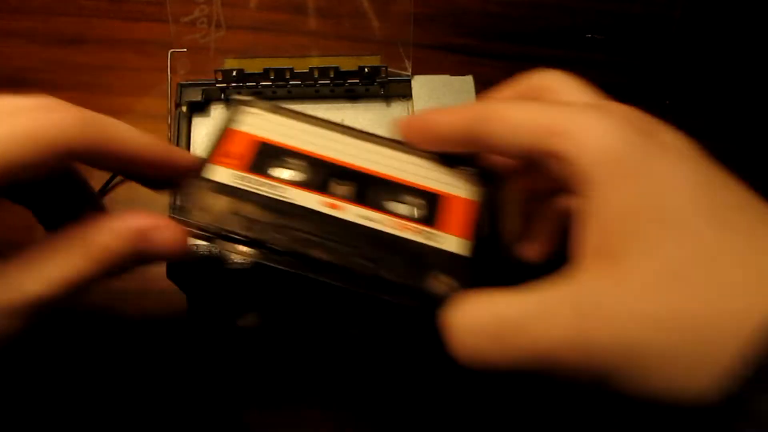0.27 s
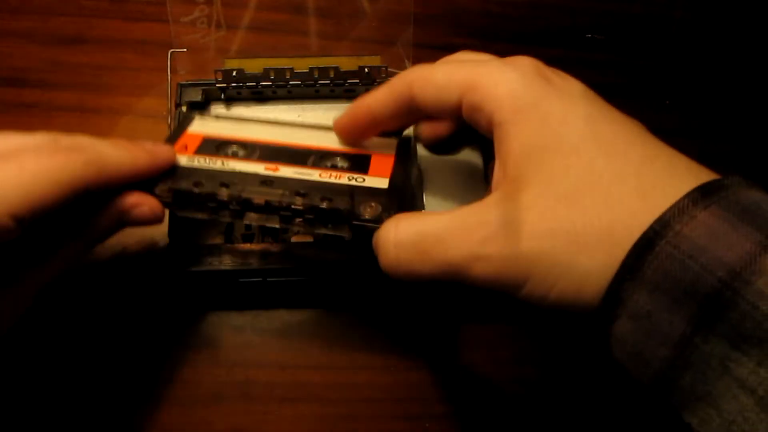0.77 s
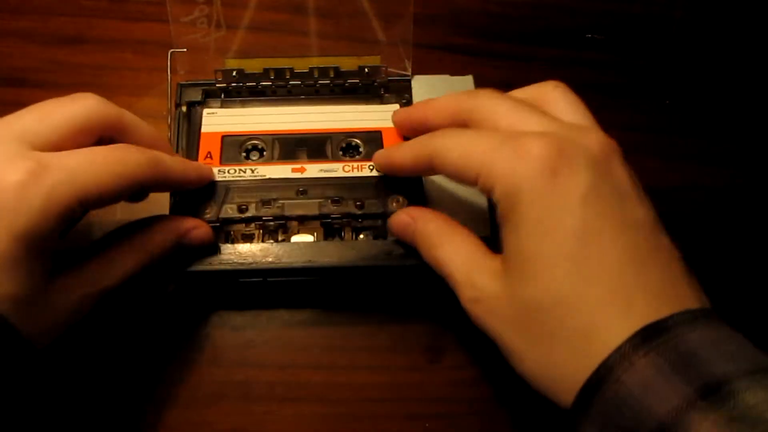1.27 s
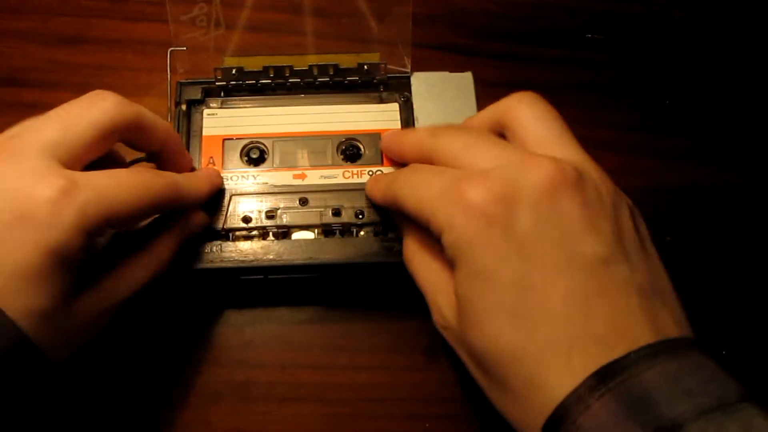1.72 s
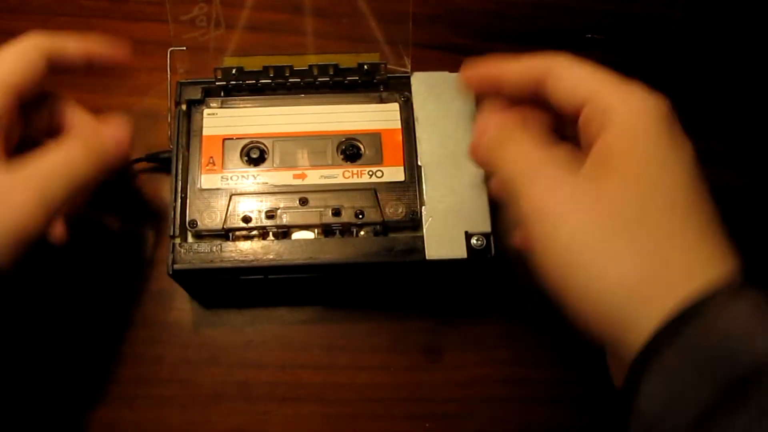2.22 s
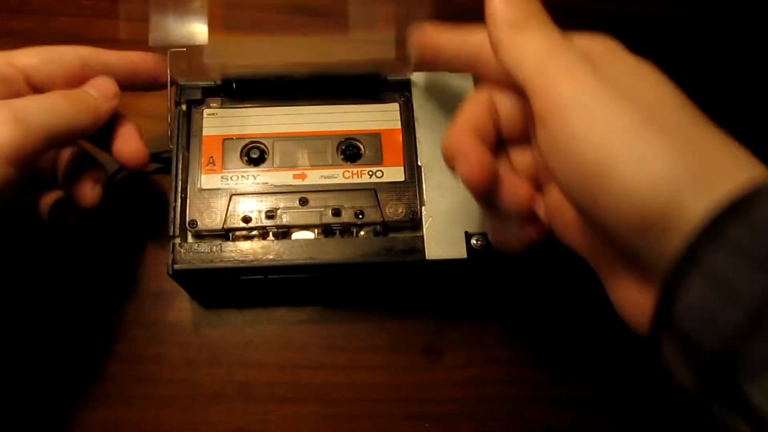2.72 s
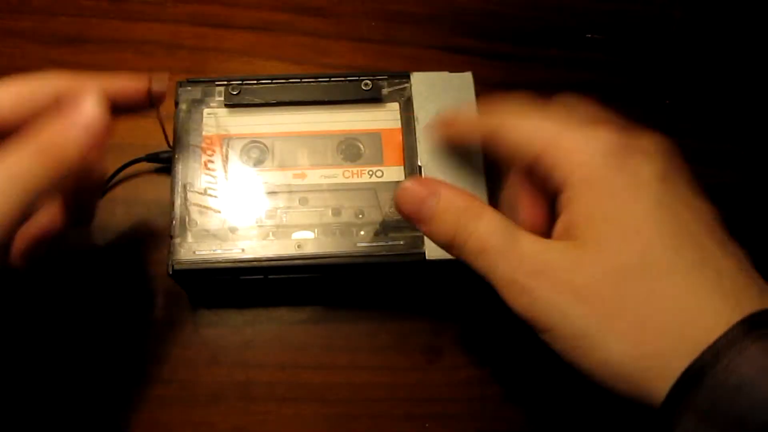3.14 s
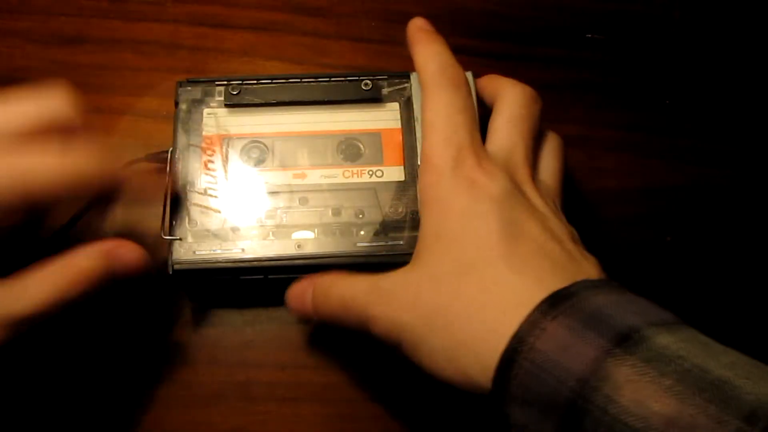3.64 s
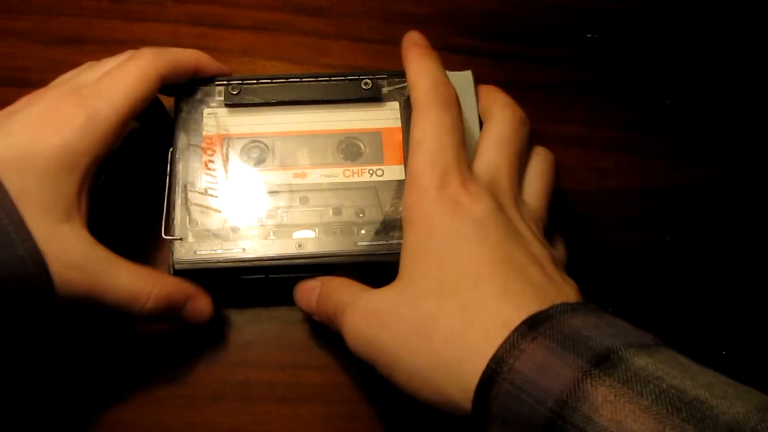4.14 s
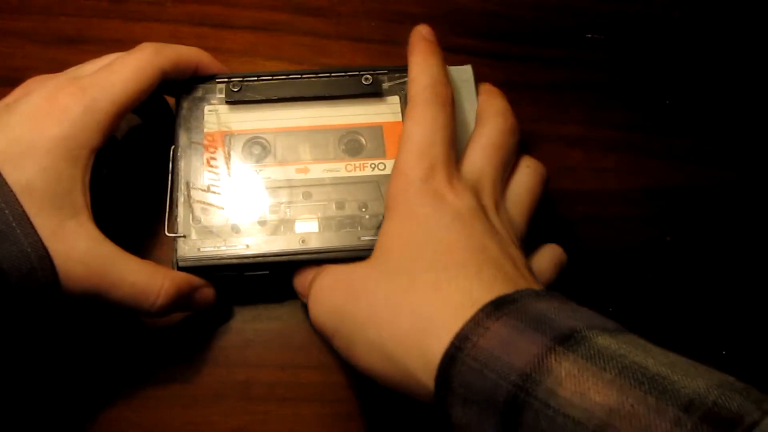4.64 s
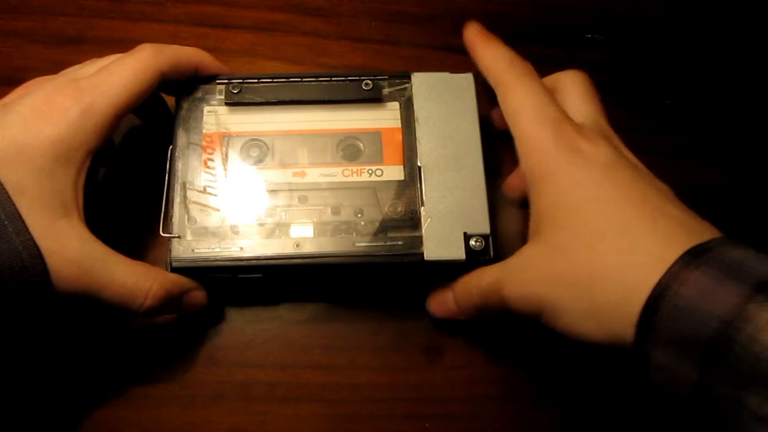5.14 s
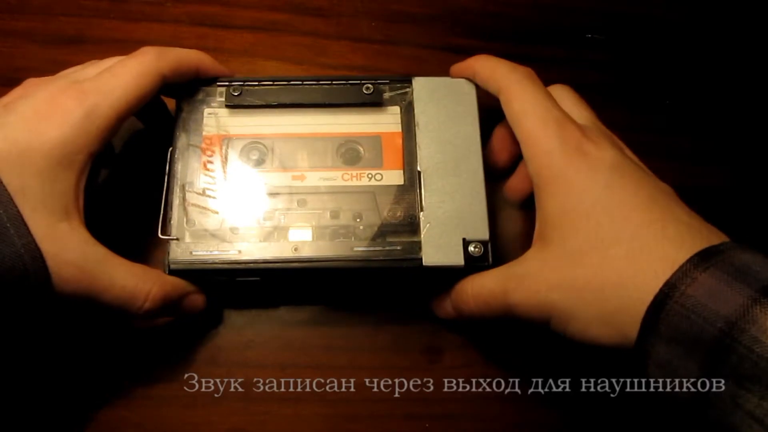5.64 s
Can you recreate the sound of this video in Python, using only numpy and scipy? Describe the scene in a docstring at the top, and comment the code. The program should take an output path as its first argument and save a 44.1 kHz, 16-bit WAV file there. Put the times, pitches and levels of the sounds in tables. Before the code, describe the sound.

A plastic cassette rattles into a player, snaps home, the lid claps shut, buttons click, then a soft thump gives way to faint hum and hiss.

```python
"""Cassette into a portable player on a desk

Close microphone in a small room: a cassette bumps into its bay and snaps home, the lid shuts and keys are worked.
Each touch is a noise crack ringing plastic resonances, with a boom from the desk; slides and rubs are shaped noise.
Behind lie a dull rumble and a thin electronic whine; the microphone's gain control ducks on loud peaks.
The sound fades, then switches with a thump to the headphone output: mains hum, motor buzz and swelling tape hiss.
"""
import sys
import numpy as np
from scipy import signal
from scipy.fft import rfft, irfft
from scipy.io import wavfile
from scipy.ndimage import uniform_filter1d

SR = 44100
rng = np.random.default_rng(int(sys.argv[2]) if len(sys.argv) > 2 else 0)


def bounce(signal):
    """Save signal as a 16-bit WAV file at the path given by the first command-line argument."""
    frames = np.transpose(np.atleast_2d(signal))
    limited = np.clip(frames, -1, 1)
    pcm = np.round(limited * 32767).astype(np.int16)
    wavfile.write(sys.argv[1], SR, pcm)


N = 259308
TIME = np.arange(N) / SR

# Cassette bumping against its bay, and fingers on the case and keys; levels precede the part's trim.
# Each row: start in seconds, strength in dB, thud in dB re strength, tick in dB re strength, number of touches.
TAPE_BUMPS = [(0.0005, -26.5, -24.5, 0, 5), (0.412, -51, -25, -1, 1), (0.602, -30.5, -12.5, -13, 1),
              (0.624, -38.5, -7, -15, 1), (0.6512, -37.5, -16, -14, 1), (0.6735, -39.5, -27, -24, 1),
              (0.697, -31, -21, -12, 1), (0.7342, -29.5, -27, -17.5, 1), (0.7797, -30, -17.5, -12.5, 2),
              (0.8957, -32.5, -15, -11.5, 2), (0.9193, -22.5, -18.5, -10.5, 2), (1.024, -53, 14, -19, 1),
              (1.033, -39, -4, -15.5, 1), (1.0605, -41, -3, -19, 2), (1.1087, -37.5, -7, -6, 1),
              (1.2285, -51, -9.5, -2.5, 1), (1.2975, -37, -5, -12.5, 2), (1.4275, -44.5, -2.5, -7.5, 2),
              (1.6785, -55, -7.5, -3.5, 1), (1.838, -56, 12, 2, 2)]
KEY_PRESSES = [(3.545, -28.5, -7, -3.5, 4), (3.695, -43.5, -11.5, -16, 1), (3.794, -47, -12, -21, 1),
               (4.209, -44, -1, -4, 1), (4.2205, -28.5, -20.5, -8.5, 2), (4.241, -42, -16, -16, 1),
               (4.328, -38.5, -20, -4, 1), (4.335, -31.5, -17, -4.5, 1)]
# Cassette snapping under its clips, lid falling shut and bouncing, lid pressed into its catch.
# Each row: start in seconds, clack, thud, knock and tick in dB before the part's trim,
# crack decay to -60 dB in seconds before the part's linger factor.
CLIP_HITS = [(1.4521, -34, -41, -39, -40.5, 0.059), (1.4632, -19, -41.5, -34, -23, 0.03),
             (1.467, -14.5, -36.5, -26.5, -16.5, 0.015), (1.485, -38, -42, -40.5, -38.5, 0.0087)]
LID_HITS = [(2.6602, -12.5, -34.5, -20.5, -12.5, 0.034), (2.6892, -28, -58.5, -35.5, -26, 0.035),
            (2.7112, -35.5, -64, -43, -33, 0.067), (2.808, -34, -73, -45.5, -35, 0.049)]
CATCH_HITS = [(3.216, -27.5, -55.5, -45, -24.5, 0.044), (3.2187, -25, -51, -36, -30, 0.067)]
# Resonances of each plastic part. Each row: frequency in Hz, width in Hz before hand damping,
# relative level in dB before the scatter from touch to touch.
TAPE_MODES = [(810, 35, -3), (1400, 70, -3.5), (1840, 300, 0), (2180, 31, -3), (2540, 46, -5),
              (2880, 120, -0.5), (3880, 150, -3.5), (4466, 64, -13.5), (6100, 52, -22), (6830, 110, -16.5),
              (7500, 72, -14), (8000, 170, -12.5), (9030, 110, -12.5), (9700, 73, -14.5),
              (10500, 67, -13.5), (10970, 90, -18.5)]
CLIP_MODES = [(870, 72, -4), (1495, 41, -7.5), (1850, 73, -1), (2250, 130, -6.5), (2970, 85, -9.5),
              (3170, 200, -3), (3650, 50, -8.5), (4250, 150, 0), (5000, 60, -14.5), (6290, 98, -8),
              (6500, 160, -4.5), (7100, 64, -2.5), (7560, 38, -5), (7370, 230, -3.5), (8630, 86, -7),
              (9100, 50, -12), (9400, 34, -12), (9800, 210, -11), (10700, 150, -13.5), (11700, 91, -14.5),
              (12900, 150, -17.5)]
LID_MODES = [(1113, 180, 3.5), (2329, 34, 0), (2755, 85, 1), (3770, 460, 0.5), (4330, 420, -5),
             (4970, 73, -9), (5870, 79, -11), (6400, 250, -2.5), (7035, 120, -7.5), (6500, 52, -12.5),
             (7640, 90, -13), (8800, 200, -12), (8810, 74, -12), (9470, 450, 2), (9500, 330, -5),
             (10300, 54, -7), (11100, 170, 0), (11550, 46, -6.5), (11580, 100, -6.5), (11725, 120, -3),
             (11700, 51, -5), (12800, 71, -15.5)]
CATCH_MODES = [(2410, 72, 2), (2820, 110, 6.5), (3660, 60, 0.5), (4970, 89, -6.5), (6200, 56, -23),
               (7300, 83, -6), (8190, 40, -14), (8860, 92, -3), (9500, 54, -7), (10200, 54, -11),
               (10800, 88, -8), (11500, 230, -13), (11900, 250, -6), (13100, 260, -22)]
KEY_MODES = [(289.7, 23.6, -5), (912, 63, -3.5), (1328, 180, -2), (2540, 110, -4), (2960, 140, 3.5),
             (3410, 240, -7), (4650, 49, -34), (5060, 48, -33), (5940, 37, -33), (6890, 31, -1),
             (7400, 68, -6.5), (8400, 36, -20), (9000, 48, -15.5), (8400, 60, -8), (9770, 200, -6),
             (10800, 58, -6), (10600, 110, -9), (11300, 43, -22), (12200, 32, -12)]
# Plastic sliding on plastic, fingertips dragging off the cassette, hands shifting the player on the desk.
# Each row: start of the hold in seconds, length of the hold in seconds, gain in dB.
SLIDES = [(0.46, 0.085, -62.5), (0.665, 0.02, -52), (0.75, 0.098, -50.5), (0.93, 0.024, -51.5),
          (1.07, 0.038, -57)]
RUBS = [(1.745, 0.026, -61), (1.932, 0.0087, -44)]
SHIFTS = [(0.68, 0.025, -50), (0.98, 0.55, -57)]
# Spectra of those movements, the room background and the tape hiss.
# Each row: frequency in Hz, relative density in dB per Hz.
SLIDE_COLOUR = [(410, -30), (700, -7.5), (1200, -6.5), (1790, -3), (2010, -6), (2330, -5), (4470, -11),
                (4950, -18), (8070, -13.5), (11500, -18.5), (14000, -47)]
RUB_COLOUR = [(350, -43), (600, -23), (842, 2), (1110, -9), (1390, -1), (2130, -13), (2670, -2),
              (3340, 1.5), (3880, -10), (5120, -12), (8240, -19), (8990, -11), (12000, -27), (15600, -57),
              (22000, -120)]
SHIFT_COLOUR = [(30, -8), (150, -5), (260, -1.5), (400, -10), (1000, -13), (2000, -25), (8000, -43),
                (15000, -60)]
FLOOR_COLOUR = [(15, -31), (25, 0), (49, -1.5), (75, -7.5), (243, -8), (318, -13), (1000, -16.5),
                (1960, -24), (5880, -29), (7280, -31.5), (7890, -28), (8550, -28), (10300, -30.5),
                (13100, -36), (15000, -64.5)]
HISS_COLOUR = [(20, 23.5), (45, 7), (130, 0.5), (300, -7), (1000, -11.5), (2900, -13), (6000, -8.5),
               (9000, -4.5), (12900, -2), (14200, -9), (15300, -33)]
# Steady background tones. Each row: frequency in Hz, level in dB re the background.
FLOOR_TONES = [(49, -11.5), (255, -15.5), (10083, -32)]
# Mains hum harmonics. Each row: frequency in Hz, level in dB re the hum.
MAINS = [(50, 1.5), (100, -20), (150, -40), (300, -38), (450, -50), (500, -42)]
# Motor buzz harmonics. Each row: frequency in Hz, level in dB re MOTOR_DB.
MOTOR = [(278.3, -35), (556.6, -35), (834.9, -40), (1113.6, -42.5), (1392.5, -46.5), (1669, -44),
         (1949, -50)]
# Brief flares of the hiss. Each row: start of the hold in seconds, length of the hold in seconds, gain in dB.
FLARES = [(4.88, 0.019, -75), (4.99, 0.02, -76), (5.76, 0.041, -71.5)]

CHATTER_LOSS_DB = 6     # from the first touch of a chatter to the last
ROOM_RING_LOSS_DB = 14  # summed over all directions, the resonances stand out this much less
FLOOR_DB = -54.5
WHINE_HZ, WHINE_WIDTH_HZ, WHINE_DB = 7840, 90, -18.5  # dB re background
THRESHOLD_DB, DUCK_S, RECOVER_DB_PER_S = -19.5, 0.15, 10
FADE_S, FADE_DB_PER_S = 3.933, 35.5  # start and rate of the microphone's fade
SWITCH_S = 4.371                     # headphone output takes over
HUM_DB, HUM_DB_PER_S = -60, 2        # level at the switch, then steady swell
HISS_DB, HISS_DB_PER_S = -72, 3.5
MOTOR_DB = -58
PING_HZ, PING_DB, PING_T60_S = 3903, -76, 0.27  # a faint, high, fading tone at the switch
CUTOFF_HZ = 15700


def from_db(db):
    """Decibels to gain."""
    return 10 ** (np.asarray(db) / 20)


def rms_one(x):
    """Scale to unit rms."""
    return x / np.sqrt(np.mean(x ** 2) + 1e-20)


def dying(t, t60):
    """Exponential decay, 60 dB down after t60 seconds."""
    return np.exp(-np.log(1000) * t / max(t60, 1e-3))


def strokes(rows, attack_s, release_s):
    """Gain of movements that rise 60 dB over the attack, hold, and fall 60 dB over the release."""
    gain = 0
    for start_s, length_s, db in rows:
        rise = dying(np.maximum(start_s - TIME, 0), attack_s)
        fall = dying(np.maximum(TIME - start_s - length_s, 0), release_s)
        gain = gain + from_db(db) * rise * fall
    return gain


def bandpass(low_hz, high_hz, order):
    """Band-pass filter sections."""
    return signal.butter(order, [low_hz, high_hz], "band", fs=SR, output="sos")


def band(x, low_hz, high_hz, order=2):
    """Causal band-pass."""
    return signal.sosfilt(bandpass(low_hz, min(high_hz, .45 * SR), order), x)


def noise(colour):
    """Unit-rms noise with the given spectrum."""
    hz, db = np.transpose(colour)
    shape_db = np.interp(np.log(np.fft.rfftfreq(N, 1 / SR) + 1), np.log(hz), db)
    spectrum = rfft(rng.standard_normal(N)) * from_db(shape_db)
    return rms_one(irfft(spectrum, N))


def tones(lines):
    """Steady sines at their rms levels, each from a random phase."""
    return sum(np.sqrt(2) * from_db(db) * np.sin(2 * np.pi * (hz * TIME + rng.random()))
               for hz, db in lines)


def chatter(bumps, gap_s, knock_db, knock_share, t60):
    """Each bump is a quick run of weakening touches; the heavier its thud, the more it knocks."""
    hits = []
    for start_s, strength_db, thud_db, tick_db, touches in bumps:
        for k, progress in enumerate(np.linspace(0, 1, max(round(touches), 1))):
            clack = strength_db - CHATTER_LOSS_DB * progress ** 2
            knock = clack + knock_db + knock_share * thud_db
            hits.append((start_s + k * gap_s, clack, clack + thud_db, knock, clack + tick_db, t60))
    return hits


def crack(t, t60):
    """Countless short plastic modes, struck evenly: a dying burst with a nearly flat spectrum."""
    burst = rng.standard_normal(len(t)) * dying(t, t60)
    # keep the phases, flatten the magnitudes
    even = irfft(np.exp(1j * np.angle(rfft(burst))), len(t))
    return even * dying(t, 4 * t60)


def ringing(t, modes, damping_hz, scatter_db):
    """Impulse response of a hand-damped part; each touch weights the modes anew."""
    hz, width_hz, mode_db = np.transpose(modes)[:, :, None]
    decay = np.pi * (width_hz + damping_hz)
    height = from_db(mode_db + scatter_db * rng.standard_normal(hz.shape))
    envelope = height * 2 * decay / SR * np.exp(-decay * t)
    return np.sum(envelope * np.cos(2 * np.pi * hz * t), axis=0)


def contacts(hits, modes, level_db, ring_db, boom_db, top_hz, damping_hz, linger=1, scatter_db=2.5,
             thud_hz=150, clack_hz=5000, tick_hz=5000, boom_hz=255, boom_t60=0.25):
    """Each touch is a crack that sets the part ringing, levelled in four bands, plus a boom.

    Two rows: the sound towards the microphone, and the less ringing sound that spreads into the room."""
    t, long_t = TIME[:SR // 12], TIME[:SR // 3]
    # clack, thud, knock, tick
    ranges = [(1500, clack_hz), (thud_hz, 380), (480, 1500), (tick_hz, 16000)]
    filters = [bandpass(low, high, 3) for low, high in ranges]
    smooth_top = signal.butter(4, min(top_hz, .45 * SR), fs=SR, output="sos")
    boom = np.sin(2 * np.pi * boom_hz * long_t) * dying(long_t, boom_t60)
    boom /= np.linalg.norm(boom)
    ring_gain = from_db([[ring_db], [ring_db - ROOM_RING_LOSS_DB]])
    out = np.zeros((2, N + SR))
    for start_s, *levels, t60 in hits:
        burst = crack(t, t60 * linger)
        ring = signal.fftconvolve(burst, ringing(t, modes, damping_hz, scatter_db))[:len(t)]
        blow = signal.sosfilt(smooth_top, burst + ring_gain * ring)
        start = max(round(start_s * SR), 0)
        for db, sos in zip(levels, filters):
            part = signal.sosfilt(sos, blow)
            part /= np.linalg.norm(part, axis=1, keepdims=True)
            out[:, start:start + len(t)] += from_db(db) * part
        # the thud also sets the case booming on the desk
        boom_gain = from_db(levels[1] + boom_db) * rng.choice([-1, 1])
        out[:, start:start + len(boom)] += boom_gain * boom
    # before the trim, a level is the rms that the blow would have if it lasted 6 ms
    return from_db(level_db) * out[:, :N] * np.sqrt(.006 * SR)


def friction(colour, grains_per_s, grain_db):
    """A smooth rub with tiny slips in it."""
    slips = (rng.random(N) < grains_per_s / SR) * rng.standard_normal(N)
    return noise(colour) + from_db(grain_db) * rms_one(band(slips, 1300, 3100))


def handling():
    """The cassette slides, fingertips drag over it and the player shifts dully on the desk."""
    sliding = friction(SLIDE_COLOUR, grains_per_s=440, grain_db=-2)
    rubbing = friction(RUB_COLOUR, grains_per_s=580, grain_db=-17.0)
    slide = strokes(SLIDES, attack_s=0.11, release_s=.3) * sliding
    rub = strokes(RUBS, attack_s=.11, release_s=0.079) * rubbing
    shift = strokes(SHIFTS, attack_s=0.43, release_s=1.0) * noise(SHIFT_COLOUR)
    return slide + rub + shift


def ping(t):
    """A faint, high tone that fades away after the switch."""
    return tones([(PING_HZ, PING_DB)]) * dying(t, PING_T60_S)


def headphone_output(thump_db=-22, rise_s=0.0026, fall_s=0.044, swing_hz=1.9):
    """A voltage step drains through the coupling capacitor; hum, motor buzz and tape hiss remain."""
    t = np.maximum(TIME - SWITCH_S, 0)
    onset = 1 - np.exp(-t / rise_s)
    thump = -from_db(thump_db) * onset * np.exp(-t / fall_s) * np.cos(2 * np.pi * swing_hz * t)
    hum = from_db(HUM_DB + HUM_DB_PER_S * t) * tones(MAINS)
    motor = from_db(MOTOR_DB) * tones(MOTOR)
    hiss = from_db(HISS_DB + HISS_DB_PER_S * t) * noise(HISS_COLOUR)
    flare_noise = rms_one(band(rng.standard_normal(N), 7720, 11000))
    flares = strokes(FLARES, attack_s=.15, release_s=.15) * flare_noise
    return thump + (hum + motor + hiss + flares) * onset


def after_switch(rise_s=0.0026):
    """The headphone output, with a faint fading ping heard at the switch."""
    t = np.maximum(TIME - SWITCH_S, 0)
    return headphone_output(rise_s=rise_s) + ping(t) * (1 - np.exp(-t / rise_s))


def room(direct, spread, wet_db=-15, t60=0.45, treble_db=-2, treble_t60=0.3,
         early_db=-14, early_t60=0.095, split_hz=4500):
    """Quick reflections from desk and hands, then a short diffuse tail whose treble dies first."""
    t = TIME[:SR // 2]
    build_up = 1 - np.exp(-(t / 0.0016) ** 2)
    white = rng.standard_normal((3, len(t))) * build_up
    body = band(white[0], 100, split_hz) * dying(t, t60)
    treble = from_db(treble_db) * band(white[1], split_hz, 14000) * dying(t, treble_t60)
    tail = from_db(wet_db) * (body + treble) / np.linalg.norm(dying(t, t60))
    early = white[2] * dying(t, early_t60)
    early *= from_db(early_db) / np.linalg.norm(early)
    return direct + signal.fftconvolve(spread, tail + early)[:N]


def background():
    """Steady room rumble with tones, and a thin, unsteady electronic whine of narrow-band noise."""
    low_hz, high_hz = WHINE_HZ - WHINE_WIDTH_HZ / 2, WHINE_HZ + WHINE_WIDTH_HZ / 2
    whine = rms_one(band(rng.standard_normal(N), low_hz, high_hz))
    return from_db(FLOOR_DB) * (noise(FLOOR_COLOUR) + tones(FLOOR_TONES) + from_db(WHINE_DB) * whine)


def gain_control(x):
    """A peak over the threshold pulls the gain smoothly down by its excess; the gain then creeps back."""
    power = np.abs(uniform_filter1d(x ** 2, size=SR // 500))
    excess_db = np.maximum(10 * np.log10(power + 1e-12) - THRESHOLD_DB, 0)
    # running maximum along a slope: the held excess falls at the recovery rate
    recovery_db = RECOVER_DB_PER_S * TIME
    held_db = np.maximum.accumulate(excess_db + recovery_db) - recovery_db
    pole = np.exp(-1 / (DUCK_S * SR))
    return x * from_db(-signal.lfilter([1 - pole], [1, -pole], held_db))


def scene():
    """The handling in the room, faded out just before the switch to the headphone output."""
    tape_hits = chatter(TAPE_BUMPS, gap_s=.0052, knock_db=-3.5, knock_share=0.39, t60=0.034)
    key_hits = chatter(KEY_PRESSES, gap_s=0.0044, knock_db=2, knock_share=0.61, t60=0.043)
    tape = contacts(tape_hits, TAPE_MODES, level_db=-0.5, ring_db=10.5, boom_db=-1.5, top_hz=10700,
                    damping_hz=50, scatter_db=6.0, clack_hz=4070, tick_hz=6100)
    clips = contacts(CLIP_HITS, CLIP_MODES, level_db=-0.5, ring_db=11.5, boom_db=5, top_hz=11400,
                     damping_hz=70, linger=1.0)
    lid = contacts(LID_HITS, LID_MODES, level_db=0.5, ring_db=9, boom_db=-9, top_hz=11900,
                   damping_hz=90, linger=0.49, thud_hz=70)
    catch = contacts(CATCH_HITS, CATCH_MODES, level_db=1.0, ring_db=17.5, boom_db=-5, top_hz=12400,
                     damping_hz=50, linger=0.97)
    keys = contacts(key_hits, KEY_MODES, level_db=0.5, ring_db=11.5, boom_db=-3.5, top_hz=11200,
                    damping_hz=51.3, scatter_db=5, clack_hz=4400, tick_hz=5470, boom_hz=270, boom_t60=0.15)
    direct, spread = tape + clips + lid + catch + keys + handling()
    microphone = gain_control(room(direct, spread) + background())
    fade = from_db(-FADE_DB_PER_S * np.maximum(TIME - FADE_S, 0))
    cut = np.clip((SWITCH_S - TIME) / .028, 0, 1) ** 2
    return (microphone * fade * cut + after_switch())[None]


def record(dry):
    """The hardest peaks are rounded and the top is cut steeply."""
    rounded = dry / (1 + (dry / .92) ** 4) ** (1 / 4)
    steep_cut = signal.ellip(10, .1, 80, CUTOFF_HZ, fs=SR, output="sos")
    return signal.sosfilt(steep_cut, rounded)


dry = scene()
out = record(dry)
bounce(out)
```